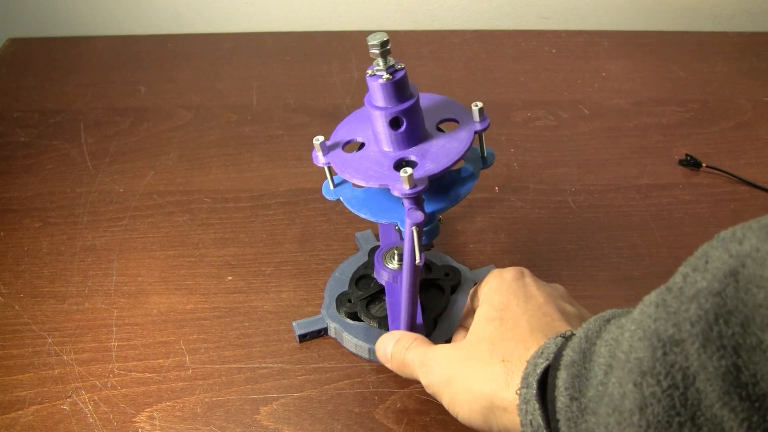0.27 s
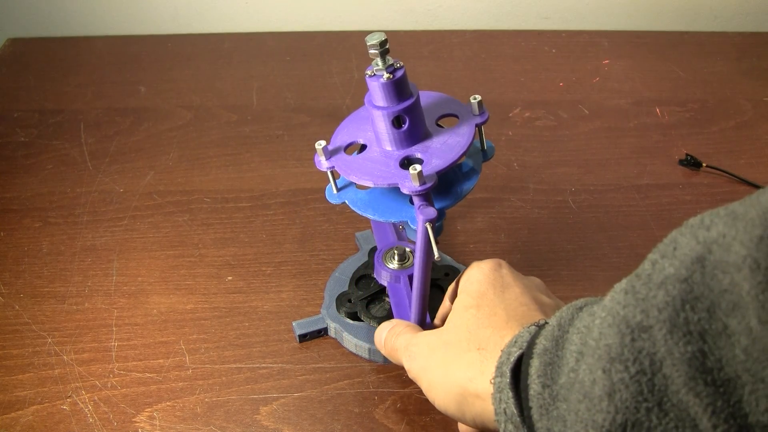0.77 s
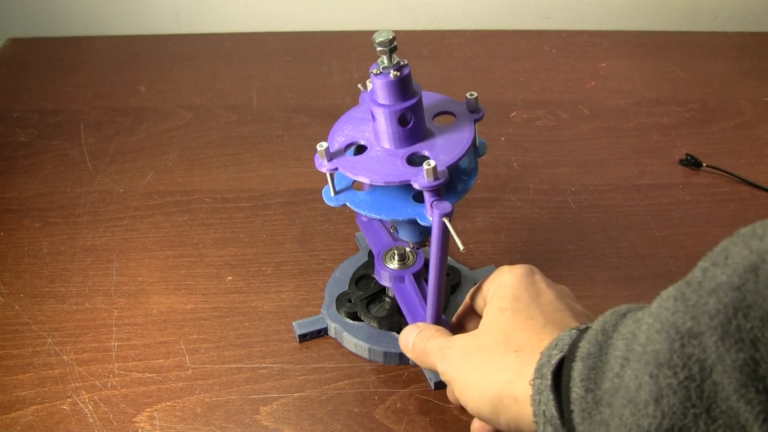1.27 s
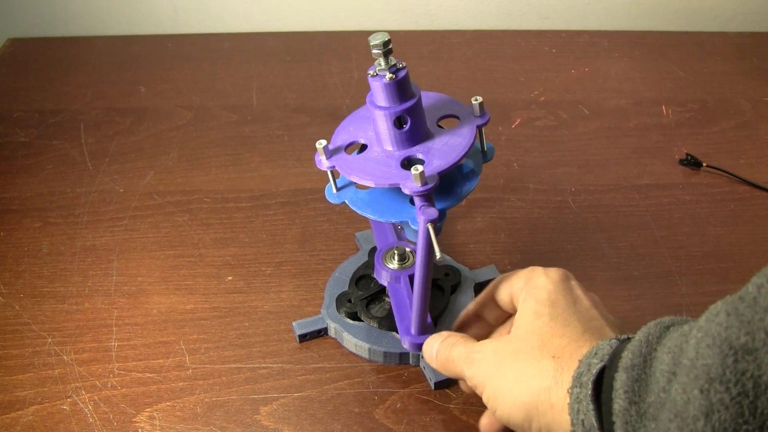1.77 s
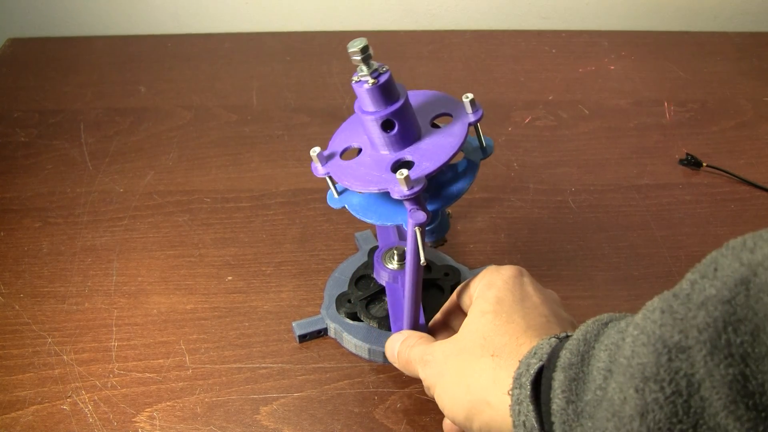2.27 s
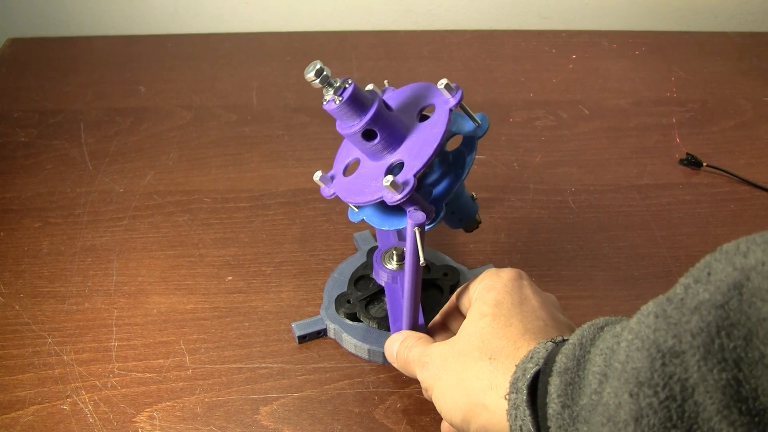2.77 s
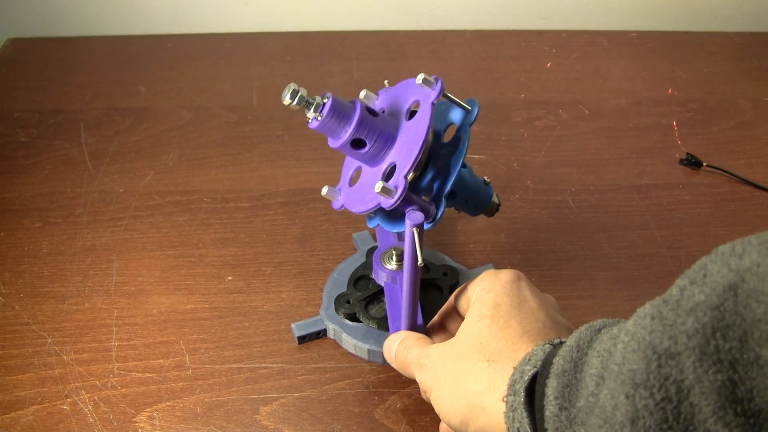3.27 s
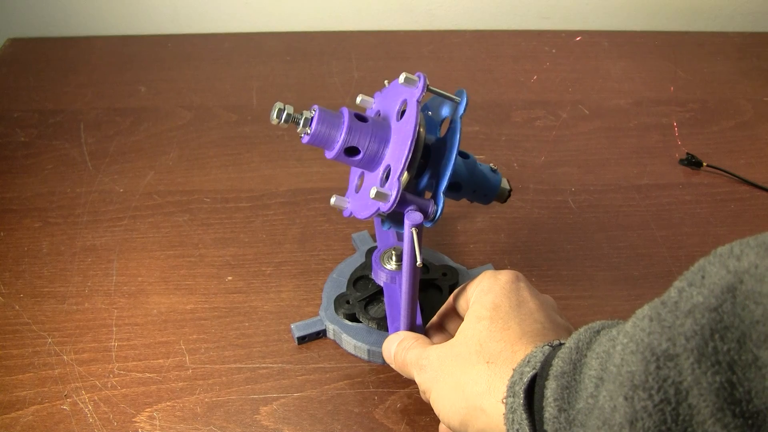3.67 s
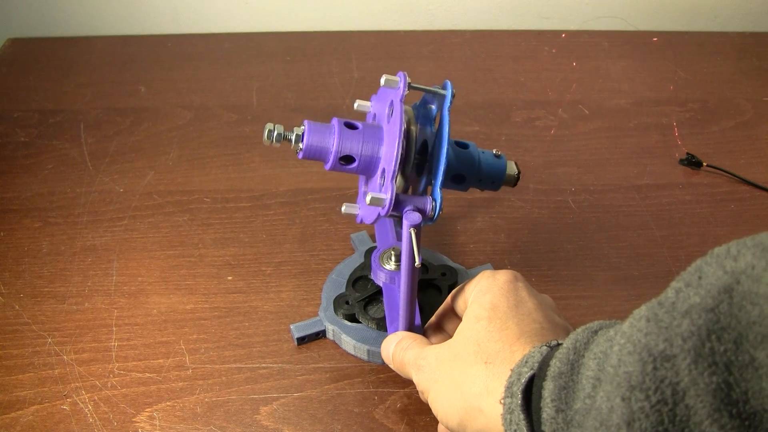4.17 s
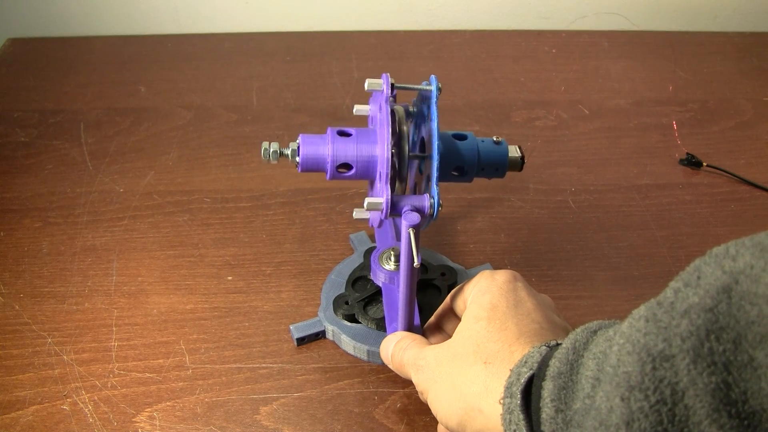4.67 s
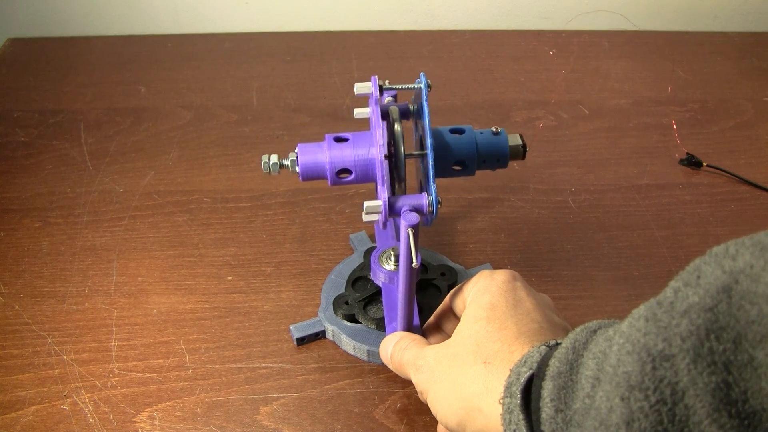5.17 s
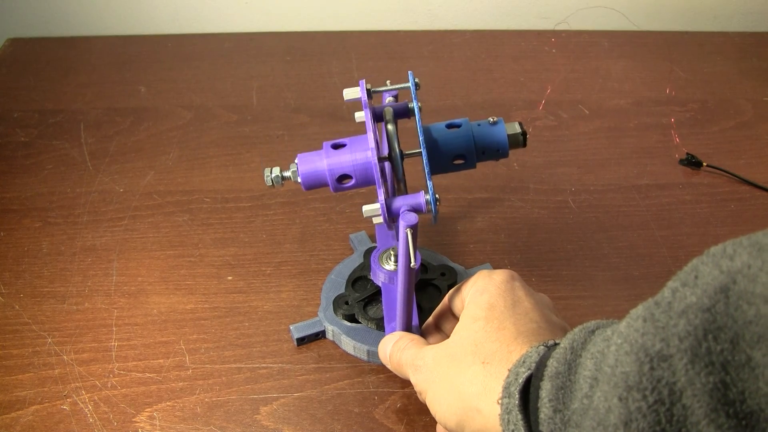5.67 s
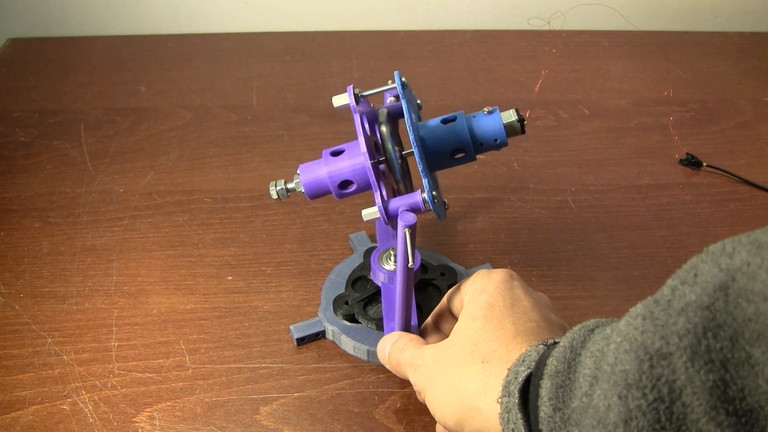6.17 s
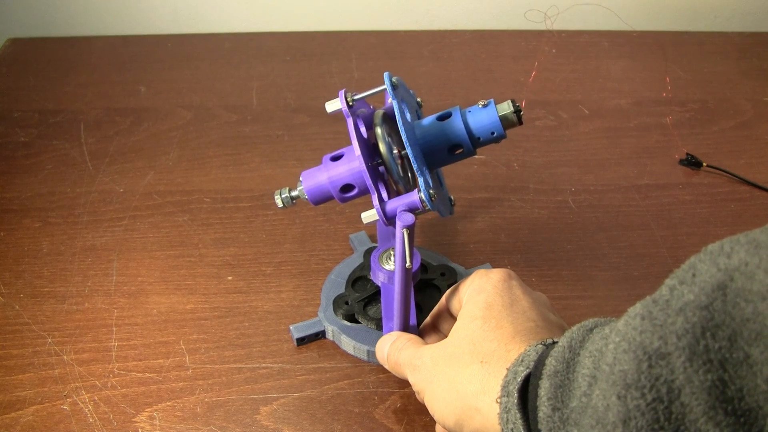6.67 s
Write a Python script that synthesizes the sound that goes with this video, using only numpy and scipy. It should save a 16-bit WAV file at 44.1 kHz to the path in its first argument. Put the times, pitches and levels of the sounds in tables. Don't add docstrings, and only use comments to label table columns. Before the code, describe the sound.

Continuous bright, hissy whirr of a fast toy rotor with wavering whines and whistles, its tone changing as a hand tips it over.

```python
import sys
import numpy as np
from scipy import signal
from scipy.fft import rfft, irfft, next_fast_len
from scipy.io import wavfile

SR = 44100
rng = np.random.default_rng(int(sys.argv[2]) if len(sys.argv) > 2 else 0)


def voltage_ratio(decibels):
    exponent = np.asarray(decibels, float) / 20
    return 10 ** exponent


def dump(signal):
    limited = np.clip(np.atleast_2d(signal).T, -1, 1)
    pcm = np.round(limited * 32767).astype(np.int16)
    wavfile.write(sys.argv[1], SR, pcm)


N = 305613

SHAFT_HZ, CAGE_HZ = 311.38, 119.87
SEAT_S, SEAT_RISE_S = 2.28, 0.033
# f/Hz, level/dB
STEREO_LEAN = [(60, -.8), (140, -0.2), (340, 1.5), (800, 2.5), (1300, 1.05), (5800, 0.75), (7500, .7),
               (9100, -0.7), (10200, -2), (11200, -1), (12200, 5.5), (12750, 6.5), (13700, 2.5), (15300, 4)]
# f/Hz, lead/rad
STEREO_LEAD = [(0, -0.12), (6550, 0.094), (6980, -0.039), (7840, -0.24), (9650, 0.78), (10300, 0.38),
               (11500, 0.91), (12500, 0.78), (13200, 0.0), (15300, -0.1)]


def in_time(rows):
    s, *columns = np.transpose(rows)
    return [np.interp(np.arange(N) / SR, s, c) for c in columns]


def at_hz(points, hz):
    x, y = np.transpose(points)
    return np.interp(np.log(hz + 1), np.log(x + 1), y)


def rms_one(x):
    return x / np.sqrt(np.mean(x ** 2) + 1e-20)


def drift(rate, shape=rms_one):
    r = np.exp(-200 * np.pi * rate / SR)
    chance = rng.standard_normal(N // 100 + 1002)
    slow = signal.lfilter([1], [1, -2 * r, r * r], chance)[1000:]
    return np.interp(np.arange(N) / 100, np.arange(len(slow)), shape(rms_one(slow)))


def swells(rows, rest_db):
    s, power = np.arange(0, N, 64) / SR, voltage_ratio(2 * rest_db)
    for start, length, top_db in rows:
        edge = min(0.13 * length, 0.17)
        height = np.clip(np.minimum(s - start, start + length - s) / edge, 0, 1)
        power = power + voltage_ratio(2 * top_db) * height ** 2
    return np.interp(np.arange(N) / SR, s, np.sqrt(power))


def shaded(tilt, level_db, loss_db, angle, width):
    return level_db - loss_db * np.exp(-((tilt - angle) / width) ** 2)


def echoes(hz, depth=.105):
    lag, sign = rng.uniform(0.00199, .03, 14), rng.choice([-1, 1], 14)
    coarse = np.arange(0, SR / 2 + 8, 4)
    waves = sign * np.exp(-lag / 0.034 - 2j * np.pi * np.outer(coarse, lag))
    ripple = np.abs(1 + depth * waves.sum(axis=1))
    return np.interp(hz, coarse, ripple)


def coloured(spectrum, rings=(), spread=0.94):
    # f/Hz, likeness/0..1
    likeness = [(60, 0.62), (140, 0.65), (220, 0.35), (400, 0.51), (770, 0.94), (1170, 0.99), (1700, 0.97),
                (2500, 0.96), (3100, 1), (3700, 0.97), (4300, 1), (5500, 0.93), (6100, 0.97), (6500, 0.82),
                (8300, 0.71), (11000, 0.61), (15000, 0.59)]
    size = next_fast_len(N)
    hz = np.arange(size // 2 + 1) * SR / size
    level_db = at_hz(spectrum, hz)
    for centre_hz, width_hz, peak_db in rings:
        level_db = level_db + peak_db / (1 + (2 * (hz - centre_hz) / width_hz) ** 2)
    direct, diffuse = rfft(rng.standard_normal((2, size)))
    alike = np.clip(at_hz(likeness, hz), 0, 1) ** spread
    lean_db = at_hz(STEREO_LEAN, hz)
    left = voltage_ratio(lean_db / 2) * np.exp(1j * at_hz(STEREO_LEAD, hz)) * direct
    right = voltage_ratio(-lean_db / 2) * (alike * direct + np.sqrt(1 - alike ** 2) * diffuse)
    both = voltage_ratio(level_db) * echoes(hz) * np.array([left, right])
    return rms_one(irfft(both, size)[:, :N])


def line(hz, level, flutter_db, wander, focus=2.0, rate=3.6):
    turns = hz / SR * np.arange(N) + rng.random()
    phase = 2 * np.pi * (turns - np.floor(turns)) + wander * drift(rate)
    phase = phase.astype(np.float32)
    height = np.sqrt(2) * level * drift(3.1, lambda chance: voltage_ratio(flutter_db * chance))
    pan = voltage_ratio(focus * at_hz(STEREO_LEAN, hz) / 2)
    lead = np.float32(at_hz(STEREO_LEAD, hz))
    return height * np.array([pan * np.cos(phase + lead), np.cos(phase) / pan])


def squeal(tilt):
    # t/s, length/s, level/dB
    spells = [(4.5, 2.6, -53), (4.5, .4, -49), (5.08, .23, -46), (5.5, .3, -49), (6.25, .25, -50),
              (6.56, .32, -42)]
    hz = 12900 - 43 * np.maximum(tilt - 96, 0)
    smooth = signal.butter(2, 160., fs=SR, output="sos")
    slow = signal.sosfilt(smooth, rng.standard_normal((2, N)))
    band = np.real((slow[0] + 1j * slow[1]) * np.exp(2j * np.pi * np.cumsum(hz) / SR))
    return swells(spells, rest_db=-70) * rms_one(band) * voltage_ratio([[3.], [-3.]])


def shake():
    since = np.arange(N) / SR - SEAT_S
    eased_db = -39.5 - 4. * np.maximum(since - 1.28, 0)
    seated = np.clip(since / SEAT_RISE_S, 0, 1) * voltage_ratio(eased_db)
    idle = voltage_ratio(-49 + 2.2 * drift(12.0))
    return line(SHAFT_HZ, np.maximum(idle, seated), flutter_db=0.5, wander=0.15)


def whirl():
    # f/Hz, level/dB
    wobble_tones = [(143, -1.8), (168.4, 1), (454.4, 0.66), (479.8, -1)]
    out = 0
    for hz, level_db in wobble_tones:
        start = 5.39 + 0.17 * (hz > SHAFT_HZ)
        level = swells([(start, 0.59, -55.5 + level_db)], rest_db=-120)
        out = out + line(hz, level, flutter_db=-0.5, wander=0.44)
    return out


def chirps():
    # t/s, length/s, level/dB
    bursts = [(.085, .055, -38), (.165, .05, -40), (.68, .1, -42), (.88, 0.055, -40), (.955, .05, -41),
              (1.02, 0.059, -35), (1.08, .08, -37), (1.17, .045, -42), (1.22, .095, -33), (1.43, .07, -35),
              (1.535, .045, -40), (2.4, .2, -50), (4.2, .3, -50), (6.5, 0.74, -49)]
    hz = 30 * SHAFT_HZ - 8
    return line(hz, swells(bursts, rest_db=-54), flutter_db=1.2, wander=1.1, rate=22.)


def whines():
    whine_orders = [(12, 0), (15, 1), (34, 0), (41, 0), (13, 0), (33, 0), (37, 0), (38, 0), (39, 0),
                    (40, 0), (43, 0)]
    whine_rest_db = [-50, -44, -60, -64, -46, -61, -64, -63, -63, -63, -67]
    whine_flutter_db = [1.6, .3, 1.2, 1.2, 1.2, 1.5, 1.5, 1.5, 1.5, 1.5, 1.5]
    # t/s, length/s, level/dB
    whine_swells = [
        [(-.05, .33, -35), (.47, .4, -36.5), (.81, .45, -31), (1.2, 0.46, -31.5), (1.63, .04, -33),
         (1.83, .11, -34), (2.01, .065, -31.5), (2.1, 0.06, -32.5), (2.31, .11, -31), (2.42, 0.064, -33),
         (2.7, 0.87, -40), (3.95, .4, -38.5), (4.6, 1.1, -49)],
        [(.8, 0.68, -42), (2.2, .2, -41), (2.38, .18, -34), (3.1, 2.5, -38.5), (4.5, 1., -38),
         (5.45, 1.7, -40.5)],
        [(1.58, .2, -41), (2.24, 0.32, -36), (2.55, 1., -42), (3.5, 1.08, -42), (5.55, .5, -47),
         (5.85, 1.2, -50)],
        [(1.4, .2, -51), (2.25, 1.6, -50), (2.46, .1, -42), (2.54, .3, -45), (2.8, .32, -41), (3.16, .2, -42.5),
         (3.34, .3, -46), (5.78, .4, -49), (6.1, 1., -51)],
        [(1.62, .15, -39), (2.3, .13, -37), (2.43, 0.057, -32), (2.6, 1., -46), (3.55, 0.26, -40.5),
         (3.85, 1.9, -44.5)],
    ]
    # t/s, length/s, level/dB
    high_whine_swells = [
        [(.9, .7, -50), (2.24, .35, -40), (2.6, 1.5, -59), (6.2, .8, -54)],
        [(.65, 1.1, -51), (2.2, 2.9, -51), (5., 2.1, -55)],
        [(1.1, .7, -57), (2.2, 1.1, -45), (4.6, 1.6, -57), (5.6, .6, -56), (6.12, .45, -48), (6.5, .5, -52)],
        [(2.24, 0.44, -46), (2.6, .6, -54), (3.1, .7, -50), (3.8, 2., -57), (5.9, .65, -48), (6.6, 0.27, -46)],
        [(2.6, .6, -51), (3.2, 1., -54), (3.95, .27, -46), (4.6, .7, -53), (5.27, .45, -49), (5.6, 0.55, -46),
         (6.56, .5, -48)],
        [(.2, 1.3, -59), (1.4, 1.3, -51), (2.6, 1.7, -58), (5., 1.3, -61)],
    ]
    out = 0
    settings = zip(whine_orders, whine_swells + high_whine_swells, whine_rest_db, whine_flutter_db)
    for (order, cage), rows, rest_db, flutter_db in settings:
        hz = order * SHAFT_HZ + cage * CAGE_HZ
        out = out + line(hz, swells(rows, rest_db), flutter_db=flutter_db, wander=0.32)
    return out


def singing(tilt):
    rotor_orders = [2, 3, 4, 5, 6, 8, 9, 10, 11, 15, 17, 19, 21, 23, 24, 25]
    race_orders = [29, 31, 32, 35, 42, 44, 45, 46, 47, 48, 49, 50]
    cage_orders = [(1, -1), (1, 1), (3, 1), (4, 1), (5, 1), (9, 2), (11, 1), (12, -1), (11, 2), (11, 3),
                   (13, -2), (12, 1), (13, -1), (14, -1), (16, -2), (22, 1), (41, 1)]
    # level/dB, angle/deg, width/deg, level/dB, angle/deg, width/deg
    rotor_beams = [(-61, 33, 60, -56, 89, 2.7), (-47, 26, 42, -47, 97.5, 15.6),
                   (-45.5, 13, 8.2, -53, 106, 11), (-45.5, 18, 52, -41.5, 39, 9.2),
                   (-48, 15, 35, -47, 80, 86), (-41, 7.7, 10, -44.5, 140, 62), (-51, 23, 4, -47, 83, 6.8),
                   (-40, 63, 30, -50.5, 108, 3.5), (-40, 28, 16, -38, 106, 4.5), (-44, 52, 35, -44, 63, 4),
                   (-42, 26, 15, -45, 110, 4.4), (-46, 22, 8.5, -53, 42, 16), (-56, 13, 3.6, -49, 37, 40),
                   (-62, 72, 60, -50, 84, 7), (-46, 53, 14, -47, 82, 14), (-47, 69, 9.3, -48, 110, 5)]
    race_beams = [(-55, 33, 36, -52, 93, 4), (-51, 57, 7, -43, 77, 9.4), (-49.5, 22, 3.5, -57, 68, 24),
                  (-47, 6, 6, -45, 64, 12), (-52, 51, 11, -58, 72, 20), (-56, 51, 4, -52, 69, 16),
                  (-53, 72, 11, -62, 93, 4), (-52, 30, 10, -53, 112, 5), (-58, 18, 7, -65, 75, 36),
                  (-65, 87, 60, -59, 102, 4), (-64, 33, 7, -62, 99, 4), (-63, 36, 7, -66, 108, 60)]
    cage_beams = [(-60, 49, 42, -65, 88, 3.7), (-61, 84, 4, -72, 114, 4), (-46, 26, 38, -48, 90, 5.6),
                  (-45, 7.3, 4, -48, 114, 65), (-44, 56, 4.4, -49, 150, 16), (-46, 90, 6, -44, 113, 4),
                  (-50, 20.5, 4, -45.5, 33, 56), (-43, 29, 18, -40, 106, 9), (-42, 21, 11, -47, 120, 20),
                  (-42, 8.5, 6.4, -35, 18, 3.3), (-42, 92, 8, -35, 112, 7.4), (-39, 104, 6, -33, 114, 7.5),
                  (-40, 6, 5, -38.5, 78, 26), (-49, 30, 70, -50, 93, 7.2), (-48, 55, 11, -44, 86, 4),
                  (-55, 75, 4, -60, 96, 24), (-46, 39, 6, -66, 51, 10)]
    out, angles = 0, np.arange(120)
    unseated = np.clip((SEAT_S - np.arange(N) / SR) / SEAT_RISE_S, 0, 1)
    loose = voltage_ratio(-6 * unseated)
    orders = [(order, 0) for order in rotor_orders + race_orders] + cage_orders
    for (order, cage), lobes in zip(orders, rotor_beams + race_beams + cage_beams):
        beam = 0
        for top_db, angle, width in (lobes[:3], lobes[3:]):
            beam = beam + voltage_ratio(2 * top_db) * (0.031 + np.exp(-((angles - angle) / width) ** 2))
        level = np.interp(tilt, angles, np.sqrt(beam))
        if order in race_orders:
            level = level * loose
        hz = order * SHAFT_HZ + cage * CAGE_HZ
        out = out + line(hz, level, flutter_db=1.5, wander=0.4)
    return out


def tipped_over(plates, tilt):
    # f/Hz, width/Hz, level/dB
    frame_rings = [(1410, 39, -2.2), (1550, 42, -2.4), (2410, 110, -2.5)]
    rings = 0
    for hz, width_hz, db in frame_rings:
        rings = rings + voltage_ratio(db) * signal.lfilter(*signal.iirpeak(hz, hz / width_hz, fs=SR), plates)
    return plates + np.clip((tilt - 98) / (111 - 98), 0, 1) * rings


def roar(tilt):
    # f/Hz, level/dB
    plates_up = [(500, -54), (850, -18.5), (885, -13), (1030, -6), (1240, -4), (1910, -6.5), (2440, -2),
                 (3070, -0.5), (3560, -1.5), (3640, -1.5), (4330, -5), (4690, -7), (6000, -14.5),
                 (7800, -32), (13200, -120)]
    plates_edge = [(500, -60), (850, -28), (907, -16), (993, -12), (1030, -15.5), (1110, -12.5),
                   (1400, -7.5), (2870, -8.5), (3800, -2.5), (4430, -9), (4850, -6.5), (5010, -13),
                   (6000, -15), (7800, -50), (13200, -120)]
    # f/Hz, width/Hz, level/dB
    rings_up = [(1280, 140, 3.3), (2230, 91, 4.2), (2463, 38, 5.9), (2800, 66, 3.3), (3050, 140, 3),
                (3360, 55, 1.6), (4780, 250, 4.7), (5220, 150, 4.6)]
    rings_edge = [(1460, 120, 0.78), (2360, 230, 1.8), (2970, 81, 3.6), (3400, 78, 3.1), (3870, 92, 0.89),
                  (4180, 120, 2)]
    # f/Hz, level/dB
    hiss_up = [(3060, -33), (5200, -5), (5940, -8), (6670, -1.5), (7240, -3), (7790, 1.5), (8660, -4.5),
               (9030, -4), (10200, -2), (11400, -7), (13900, -11.5), (15600, -21)]
    hiss_edge = [(3060, -24.5), (5200, -4), (5860, -9.5), (6220, -1), (7760, 1), (8350, -4), (9280, -2.5),
                 (10100, -2), (10400, -0.5), (11000, -1.5), (11600, -5), (12000, -6), (12600, -5.5),
                 (13700, -9.5), (15600, -15.5)]
    rumble_colour = [(20, -52), (60, -29), (85, -24), (125, -15), (190, -7.5), (300, -7), (420, -7),
                     (490, -1), (560, -7), (640, -1), (800, -1), (870, -10.5), (905, -23), (960, -58)]
    # level/dB, loss/dB, angle/deg, width/deg
    plates_beam = (-22, 4.5, 93, 47)
    hiss_beam = (-29, 1.84, 97, 15)
    rumble_beam = (-42.5, 2.5, 81, 42)
    # level/dB, loss/dB, angle/deg, width/deg
    hiss_turned_away = (0, 1.5, 39.5, 12.5)
    plates_db, rumble_db = shaded(tilt, *plates_beam), shaded(tilt, *rumble_beam)
    hiss_db = shaded(tilt, *hiss_beam) + shaded(tilt, *hiss_turned_away)
    edge = np.clip(tilt / 88.0, 0, 1) ** 1.83
    face, side = np.sqrt(1 - edge), np.sqrt(edge)
    edge_on = tipped_over(coloured(plates_edge, rings_edge, 2.1), tilt)
    plates = face * coloured(plates_up, rings_up, 0.83) + side * edge_on
    hiss = face * coloured(hiss_up) + side * coloured(hiss_edge)
    turn = 1 + 0.046 * np.sin(2 * np.pi * SHAFT_HZ * np.arange(N) / SR)
    load = drift(20.0)
    plates = voltage_ratio(plates_db - 0.71 + 0.37 * load) * turn * plates
    hiss = voltage_ratio(hiss_db + 0.52 + 0.22 * load + 0.19 * drift(17.0)) * turn * hiss
    return plates + hiss + voltage_ratio(rumble_db) * coloured(rumble_colour)


def scene():
    # t/s, angle/deg
    tilt_path = [(0, 0), (1.2, 6), (2.2, 12), (2.5, 25), (3, 45), (3.5, 55), (4, 68), (4.5, 85), (5, 90),
                 (5.5, 96), (6, 104), (6.93, 114)]
    tilt, = in_time(tilt_path)
    lean_db = .2 * (tilt / 90. - .4) * np.array([[1], [-1]])
    tones = singing(tilt) + whines() + chirps()
    return (squeal(tilt) + shake() + whirl() + tones + roar(tilt)) * voltage_ratio(lean_db)


def top_cut(x):
    return signal.sosfilt(signal.butter(12, 15760, fs=SR, output="sos"), x)


def record(dry):
    bass_cut = signal.butter(2, 45., "high", fs=SR, output="sos")
    return top_cut(signal.sosfilt(bass_cut, dry))


dry = scene()
out = record(dry)
dump(out)
```